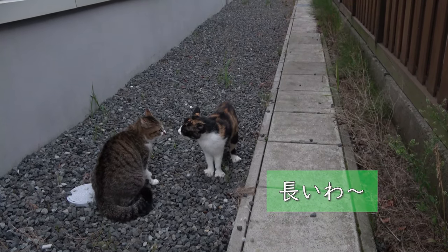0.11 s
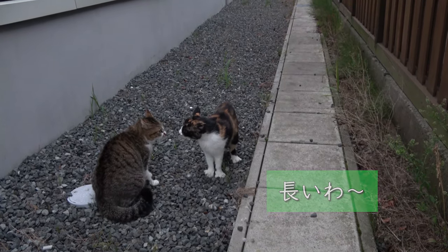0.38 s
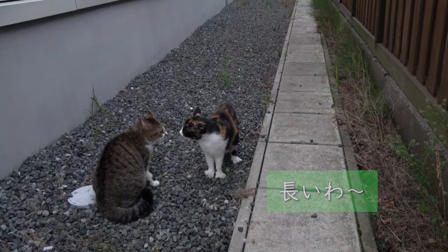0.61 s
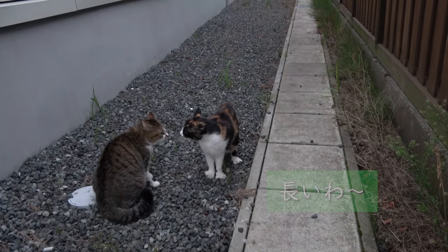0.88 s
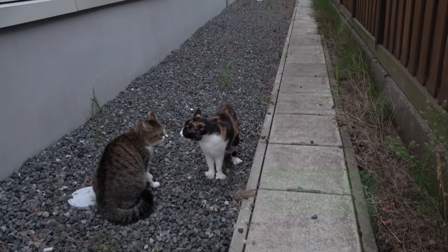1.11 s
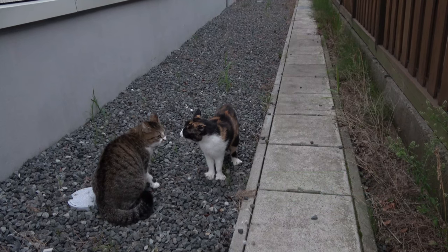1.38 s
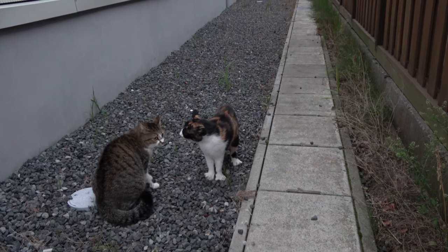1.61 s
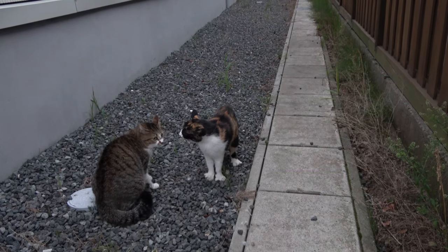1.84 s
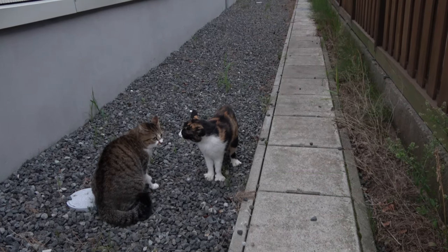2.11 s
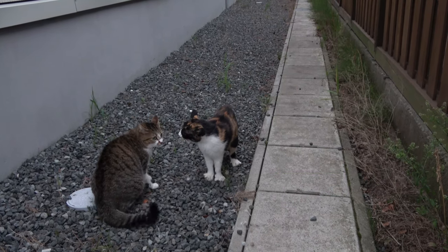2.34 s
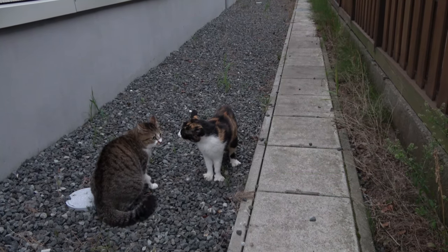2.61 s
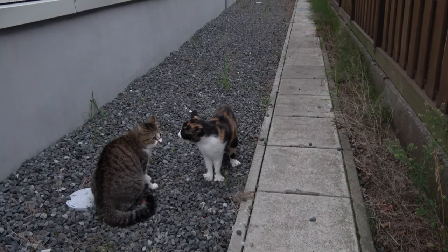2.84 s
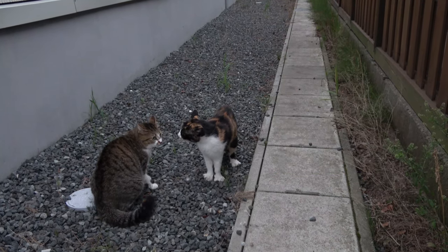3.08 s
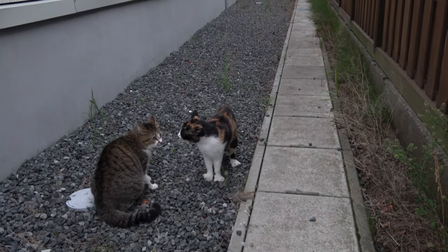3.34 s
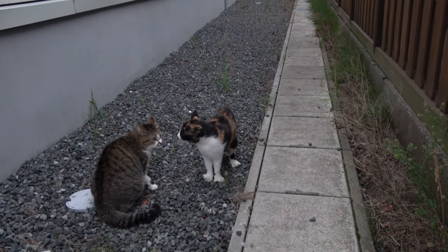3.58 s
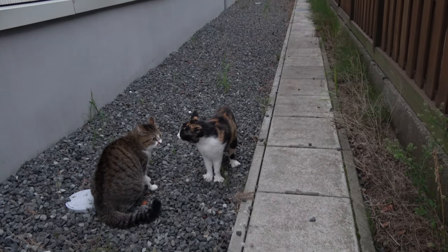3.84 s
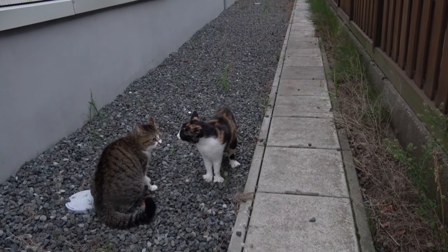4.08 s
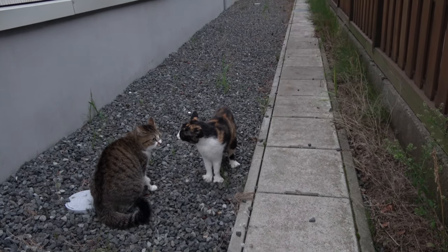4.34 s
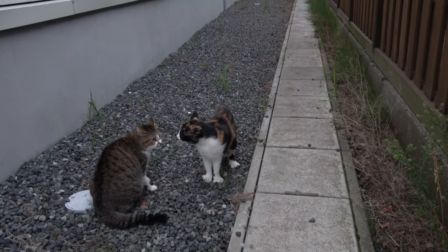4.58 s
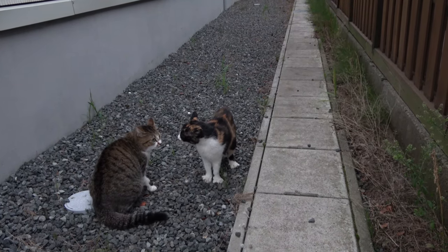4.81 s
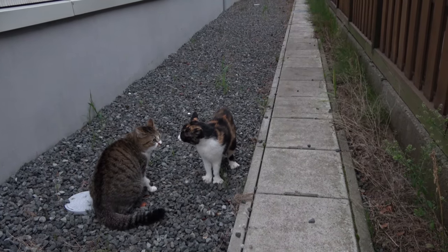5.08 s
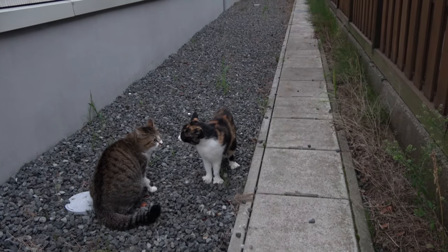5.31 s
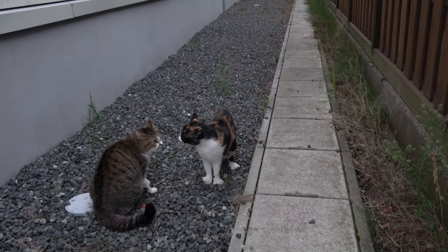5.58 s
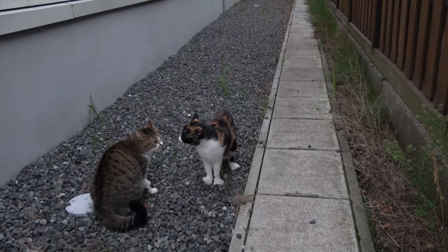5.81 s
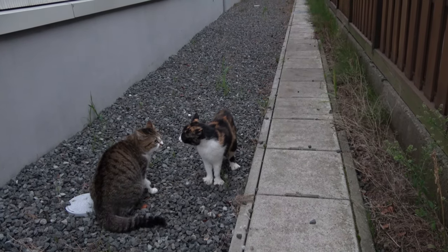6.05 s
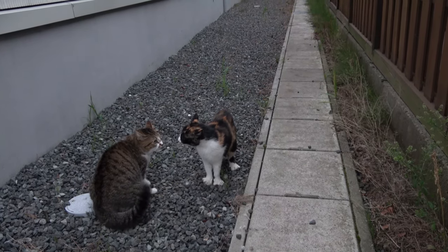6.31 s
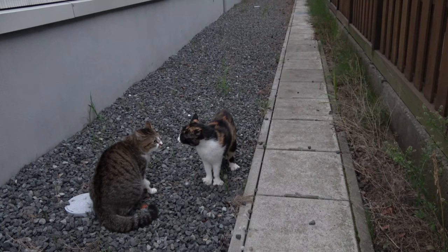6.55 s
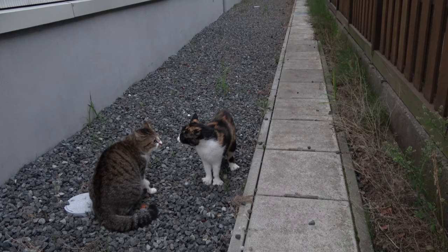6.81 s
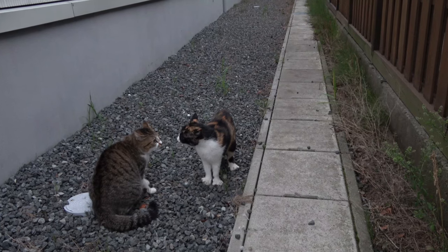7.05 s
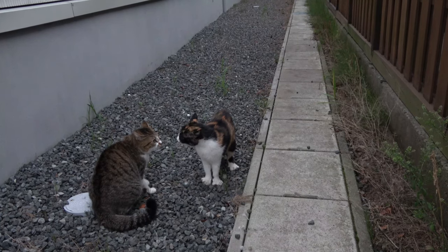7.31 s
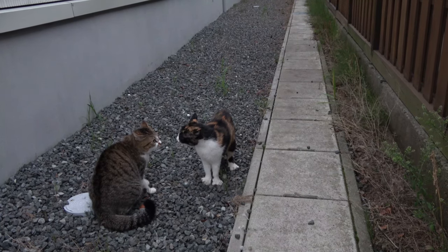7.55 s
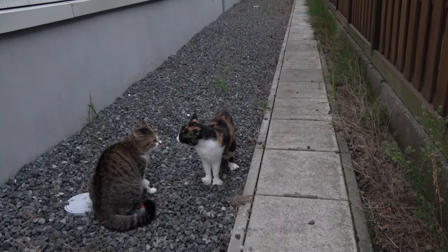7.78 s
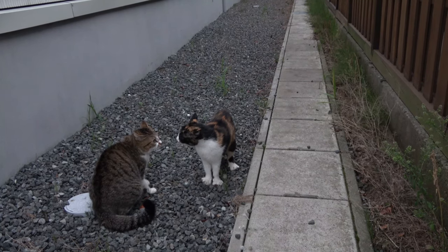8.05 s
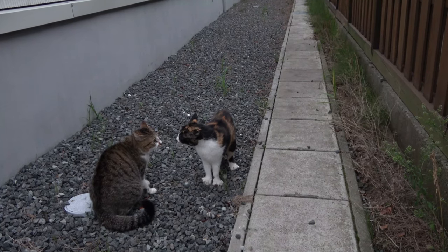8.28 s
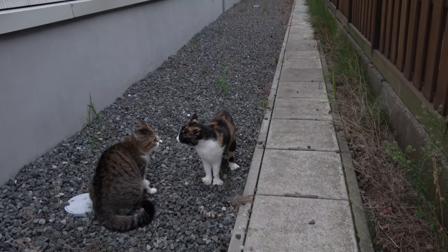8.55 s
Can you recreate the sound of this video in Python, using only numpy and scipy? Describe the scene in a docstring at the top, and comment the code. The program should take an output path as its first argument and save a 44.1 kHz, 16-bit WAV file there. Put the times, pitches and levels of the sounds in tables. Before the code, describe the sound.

Two cats yowl at each other in a narrow gravel alley, drawn-out wails rising, falling and overlapping, with dull handling thumps near the end.

```python
"""Two cats yowling in an alley

Two cats yowl in turns on gravel in a narrow alley, their calls overlapping. Each voice is a sum of
harmonics shaped by the moving resonances of an opening and shutting mouth, with a little breath hiss.
Wall and fence add short delayed copies, and a sparse decaying tail adds the alley's reverberation.
Behind lies town hum of shaped noise; gravel ticks are puffs of filtered noise, and late on
a low noise rumble swells with dull knocks made of two damped modes."""
import sys
import numpy as np
from scipy import signal
from scipy.fft import rfft, irfft, next_fast_len
from scipy.io import wavfile
from scipy.ndimage import uniform_filter1d

SR = 44100
rng = np.random.default_rng(int(sys.argv[2]) if len(sys.argv) > 2 else 0)


def transcribe(u):
    """Save the signal u as a 16-bit wav file named by the first command-line argument.

    u: samples, shape (n,) or (channels, n), limited to [-1, 1]; the rate is SR.
    q: integer samples, one column per channel.
    """
    v = np.clip(np.atleast_2d(u).T, -1, 1)
    q = np.round(v * 32767).astype(np.int16)
    wavfile.write(sys.argv[1], SR, q)


def gain_from_decibels(decibels):
    """Convert decibel values to linear amplitude factors."""
    exponent = np.asarray(decibels, float) / 20
    return 10 ** exponent


N = 381906  # length [samples]


def read(points, hz):
    """Spectral interpolation: reads a table of (frequency, value) on a log-frequency axis."""
    f, value = np.transpose(points)
    return np.interp(np.log(hz + 1), np.log(f + 1), value)


def evened(x):
    """Power normalisation: scales to rms 1."""
    return x / np.sqrt(np.mean(x ** 2) + 1e-20)


def add(mix, s, sound):
    """Superposition: adds a sound to the mix at time s."""
    part = mix[..., round(s * SR):][..., :sound.shape[-1]]
    part += sound[..., :part.shape[-1]]


def smooth_noise(size, hz):
    """Band limitation: low-pass noise of rms 1 that varies up to about hz."""
    lowpass = signal.butter(2, hz, fs=SR, output="sos")
    return evened(signal.sosfilt(lowpass, rng.standard_normal(size)))


# coherence of background noise between the ears: (frequency [Hz], left-right likeness [0-1])
LIKENESS = [(60, 0.98), (240, 0.91), (950, 0.75), (3770, 1), (15000, 0.14)]


def coloured(points, patchy_db):
    """Spectral shaping with partial coherence: stereo noise of rms 1 with drifting patches of level."""
    frames, hz = N // 512 + 5, np.fft.rfftfreq(2048, 1 / SR)
    a, b, c, d, patches = rng.standard_normal((frames, 1025, 5)).T
    patches = uniform_filter1d(patches, size=16, axis=0)
    patches = evened(uniform_filter1d(patches, size=8, axis=1))
    same = np.clip(read(LIKENESS, hz), -1, 1)[:, None]
    left, other = a + 1j * b, c + 1j * d
    z = np.array([left, same * left + np.sqrt(1 - same ** 2) * other])
    z *= gain_from_decibels(read(points, hz)[:, None] + patchy_db * patches)
    return evened(signal.istft(z, nperseg=2048, noverlap=1536)[1][:, :N])


# spectrum of the town hum: (frequency [Hz], relative density [dB per Hz])
HUM_COLOUR = [(15, -29), (25, -12), (53, -14), (156, -14.5), (410, -20.5), (444, -24), (848, -17.5),
              (1020, -26), (1240, -23), (1530, -32.5), (1750, -31.5), (2360, -36), (15500, -52)]


def town_hum():
    """Diffuse sum of many far sources: steady shaped noise at an rms of -47.5 dB."""
    return gain_from_decibels(-47.5) * coloured(HUM_COLOUR, patchy_db=0.24)


# swell of the rumble, silent at -90 dB before the first row: (time [s], rms level [dB])
RUMBLE_SWELL = [(6.499, -57), (6.88, -47.5), (7.18, -43), (7.429, -42.5), (7.79, -47.5), (7.95, -42),
                (8.13, -40), (8.33, -39.5), (8.66, -41.5)]
# spectrum of the rumble: (frequency [Hz], relative density [dB per Hz])
RUMBLE_COLOUR = [(70, -7.5), (150, -2), (240, -7), (340, -1.5), (500, -7.5), (1200, -27), (3000, -40.5)]


def rumble():
    """Amplitude modulation: low shaped noise swells late on."""
    s, level_db = np.transpose(RUMBLE_SWELL)
    swell = gain_from_decibels(np.interp(np.arange(N) / SR, s, level_db, left=-90))
    return coloured(RUMBLE_COLOUR, patchy_db=0.5) * swell


# dull knocks: (time [s], level before onset and decay [dB], upper mode relative to lower [dB])
KNOCKS = [(6.951, -37, 8), (7.087, -45.5, 15), (7.254, -25.5, -32), (7.363, -32, -10), (7.393, -30, -8),
          (7.471, -31.5, -8.5), (7.922, -38, 11), (8.192, -24.5, -4), (8.323, -26, -0.5), (8.397, -32, 3.5),
          (8.493, -35, 3), (8.602, -27, -14)]
# the lower and the upper mode of a knock: (frequency [Hz], decay by 60 dB [s])
KNOCK_MODES = [(143, 0.13), (340, 0.18)]


def knocks():
    """Modal decay: each blow sets off two damped sinusoids with a soft onset."""
    out, t = np.zeros(N), np.arange(SR // 4) / SR
    onset = 1 - np.exp(-t / 0.0032)
    low, high = (np.sin(2 * np.pi * hz * t) * gain_from_decibels(-60 * t / t60) * onset for hz, t60 in KNOCK_MODES)
    for at, db, upper_db in KNOCKS:
        add(out, at, gain_from_decibels(db) * (low + gain_from_decibels(upper_db) * high))
    return out


# ticks of small stones: (time [s], rms before decay, relative to 0.41 [dB], band centre [Hz])
TICKS = [(0.3855, -48.5, 7470), (0.4, -49, 7700), (0.41, -44, 7500), (6.2187, -46, 7200),
         (6.2612, -39.5, 7000), (6.28, -38, 7970), (6.299, -43, 7300), (6.319, -46.5, 7300),
         (6.4973, -41, 7250)]


def gravel():
    """Impulsive friction: shifting stones give band-passed noise puffs that decay exponentially."""
    out, t = np.zeros(N), np.arange(SR // 20) / SR
    for at, db, hz in TICKS:
        band = signal.butter(2, [hz * 0.69, min(hz * 1.2, 16000)], "band", fs=SR, output="sos")
        crackle = evened(signal.sosfilt(band, rng.standard_normal(len(t))))
        add(out, at, 0.41 * gain_from_decibels(db) * crackle * np.exp(-t / 0.01))
    return out


# decay of the alley's reverberation: (frequency [Hz], decay by 60 dB [s])
ALLEY_DECAY = [(300, 0.3), (1200, 0.24), (4000, 0.29), (12000, 0.16)]


def alley(x):
    """Reverberation: convolves with sparse taps of random sign, each band dying at its own speed."""
    taps = np.zeros((2, SR))
    at = np.arange(400, SR - 20, 20) + rng.integers(0, 20, (2, (SR - 401) // 20))
    np.put_along_axis(taps, at, rng.choice([-1., 1.], at.shape), 1)
    # mixing in the other ear's taps makes the two tails alike
    hz, t, z = signal.stft(taps + 0.97 * taps[::-1], SR, nperseg=256)
    decay = gain_from_decibels(-60 * t / read(ALLEY_DECAY, hz)[:, None])
    tail = signal.istft(z * decay, SR, nperseg=256)[1]
    return signal.fftconvolve(x[None], tail / np.linalg.norm(tail[0]), axes=1)[:, :N]


# echoes off wall, fence and ground, before normalising: (delay [s], gain left [-], gain right [-])
ECHOES = [(.0037, 0.73, 0.011), (.0058, -0.55, -0.33), (.0093, 0.19, -0.051), (0.0119, 0.39, -0.029)]


def early(x):
    """Comb filtering: short echoes colour the higher partials differently in each ear."""
    taps = np.zeros((2, SR // 40))
    taps[:, 0] = 1  # direct sound
    for delay, left, right in ECHOES:
        taps[:, round(delay * SR)] = left, right
    return signal.oaconvolve(x[None], taps / np.linalg.norm(taps[0]), axes=1)[:, :N]


def tilted(x):
    """Interaural level difference: the wall favours the left ear below 7 kHz, the fence the right above."""
    below = signal.sosfiltfilt(signal.butter(2, 7000, fs=SR, output="sos"), x)
    above = x - below
    return (below - above) * [[1], [-1]]


# echoes arriving from one side: (delay [s], gain [-])
SIDE_ECHOES = [(.0006, 0.65), (.0031, 0.14), (.0072, 0.29)]


def sideways(x):
    """Lateral reflection: echoes from wall and fence reach the two ears in opposite sign."""
    taps = np.zeros(SR // 50)
    for delay, gain in SIDE_ECHOES:
        taps[round(delay * SR)] = gain
    bright = signal.sosfilt(signal.butter(2, 650, "high", fs=SR, output="sos"), x)
    return signal.oaconvolve(bright, taps)[:N] * [[1], [-1]]


def paths(x, table, dips):
    """Multipath interference: delayed paths to each ear comb the low partials."""
    size = next_fast_len(N + SR // 4)
    hz = np.fft.rfftfreq(size, 1 / SR)
    ears = sum(np.outer(gains, np.exp(-2j * np.pi * hz * delay)) for delay, *gains in table)
    for dip_hz, width, *depth in dips:
        depth = np.clip(depth, -2, 1)[:, None]
        ears = ears * (1 - depth / (1 + 1j * (hz - dip_hz) / width))
    return irfft(rfft(x, size) * ears, size)[:, :N]


def resonate(x, hz, width):
    """Heterodyne resonance: shifts a moving hz down to zero, smooths twice, shifts back."""
    turn, r = np.exp(2j * np.pi * np.cumsum(hz) / SR), np.exp(-np.pi * width / SR)
    return (turn * signal.lfilter([1], np.convolve([1, -r], [1, -r]), x / turn)).real


def vocal_folds(t, hz, rest_rough, rasps):
    """Quasi-periodic oscillation: returns the phase in cycles and the rasp that modulates the partials."""
    bursts = sum(amount * np.exp(-((t - at) / half) ** 4) for at, half, amount in rasps)
    rough = np.clip(rest_rough + bursts, 0, 1) * gain_from_decibels(4 * smooth_noise(len(t), 35))
    # the folds waver slowly, and slip from cycle to cycle when pressed hard
    turns = np.cumsum(hz * (1 + .0025 * smooth_noise(len(t), 30))) / SR
    turns = turns + .03 * rough * smooth_noise(len(t), 200)
    rasp = 1 + rough * evened(uniform_filter1d(smooth_noise(len(t), 230), size=90))
    return turns, rasp


def low_partials(turns, rasp, hz, effort_db, mouth_hz, second_hz, second_db, head):
    """Source-filter principle: two mouth rings and a nasal hum weigh partials 1 to 6."""
    orders = np.arange(1, 7)[:, None]
    ring = lambda centre_hz, width: 1 / (1 + ((orders * hz - centre_hz) / width) ** 2)
    sizes = ring(mouth_hz, head["width"] * mouth_hz)
    sizes = gain_from_decibels(effort_db) * (sizes + gain_from_decibels(second_db) * ring(second_hz, head["second_width"]))
    # the nose carries the first partial, less so as the mouth opens
    nose_db, nose_share, open_db = head["nose"]
    nose_db = nose_db + nose_share * (effort_db + 25) - open_db * np.log2(mouth_hz / 1000)
    sizes[0] = np.hypot(sizes[0], gain_from_decibels(nose_db))
    # each partial wavers a little [dB rms]
    sizes *= gain_from_decibels([db * smooth_noise(len(turns), 13.2) for db in (.4, .4, .6, 1.9, 2.45, 1.94)])
    first, second, *others = sizes * np.cos(2 * np.pi * orders * turns - .6 * orders ** 2)
    return first + second + rasp * sum(others)


# rings that move with the mouth: (factor on the bright ring [-], width [Hz], strength [dB])
THROAT = [(0.999, 457, 5.5), (1.3, 650, -9), (1.63, 698, -12), (2.55, 1005, -19)]
# rings that stay: (frequency [Hz], width [Hz], strength [dB])
SKULL = [(3007, 565, 12.5), (4050, 2920, -7), (8270, 420, -11.5), (12700, 670, -36.5)]


def high_partials(turns, hz, ring_hz, ring_db):
    """Formant filtering: moving throat rings and fixed skull rings weigh partials 7 to 41."""
    hop = 64  # gains are worked out every 64 samples
    orders = np.arange(7, 42)[:, None]
    partial_hz = orders * hz[::hop]
    ring_hz, ring_db = ring_hz[::hop], ring_db[::hop]
    peak = lambda centre_hz, width, db: gain_from_decibels(db) / (1 + ((partial_hz - centre_hz) / width) ** 2) ** 2
    gains = gain_from_decibels(ring_db) * sum(peak(share * ring_hz, width, db) for share, width, db in THROAT)
    gains = gains + sum(peak(*row) for row in SKULL) + gain_from_decibels(-43.0)
    gains /= 1 + (partial_hz / 13600) ** 14
    gains /= np.sqrt((gains ** 2).sum(0))
    # as the head moves, each partial drifts in and out of the echo pattern
    drift = evened(uniform_filter1d(rng.standard_normal(gains.shape), size=70, axis=1))
    gains *= gain_from_decibels(3.6 * drift) * (partial_hz < SR / 2)
    at = np.arange(len(turns))
    return sum(np.interp(at, at[::hop], g) * np.cos(2 * np.pi * k * turns - 0.19 * k * k)
               for k, g in zip(orders[:, 0], gains))


def yowl(rows, head, bright, rasps):
    """Voiced sound with turbulence: returns the start, the low partials, and the high ones with hiss."""
    s, *columns = np.transpose(rows)
    t = np.arange(s[0], s[-1], 1 / SR)
    hz, effort_db, mouth_hz, second_hz, second_db, high_db = (np.interp(t, s, c) for c in columns)
    at, *shape = np.transpose(bright)
    ring_hz, ring_db = (np.interp(t, at, c) for c in shape)
    turns, rasp = vocal_folds(t, hz, head["rough"], rasps)
    low = low_partials(turns, rasp, hz, effort_db, mouth_hz, second_hz, second_db, head)
    high = high_partials(turns, hz, ring_hz, ring_db)
    # air escaping past the folds hisses in the bright ring, one puff a cycle
    hiss = gain_from_decibels(ring_db / 2 - 24) * evened(resonate(rng.standard_normal(len(t)), ring_hz, 800))
    puffs = hiss * (1 + np.cos(2 * np.pi * turns))
    # 12 ms ramps, except where a call is already under way at the start or runs on to the end
    rise, fall = t - s[0] + (s[0] == 0), s[-1] - t + (s[-1] > 8.6)
    ramp = np.minimum(1, np.minimum(rise, fall) / .012)
    fade = np.sqrt(2) * ramp * (1 + 0.067 * smooth_noise(len(t), 25))
    return s[0], fade * low, fade * gain_from_decibels(high_db) * (high * rasp + puffs)


def cat(calls, head, bright, rasps, table, dips):
    """Superposition of one animal's calls: returns its low part at both ears and its mono high part."""
    voice, high = np.zeros(N), np.zeros(N)
    for rows in calls:
        s, body, ring = yowl(rows, head, bright, rasps)
        add(voice, s, body)
        add(high, s, ring)
    return paths(voice, table, dips), high


# one table a call: (time [s], pitch [Hz], effort [dB], lowest mouth ring [Hz], second ring [Hz],
# second ring's strength [dB], level of the higher partials [dB])
SECOND_CALLS = [
    [(0.59, 403, -60.0, 650.0, 1720.0, -12, -80.0), (0.615, 369, -52.0, 650.0, 1720.0, -12, -79),
     (0.655, 404, -45.5, 715, 1833, -16, -72), (0.81, 400.5, -29.5, 658, 1700, -17, -70),
     (0.93, 392.4, -30.5, 671, 1745, -15, -74), (1.08, 404, -30.5, 654, 1738, -12, -68),
     (1.27, 411, -36.6, 706, 1810, -12, -70), (1.35, 397, -32.7, 636, 1700.0, -16, -68),
     (1.43, 359.0, -30, 533, 1518, -16, -70), (1.55, 319.3, -37.5, 601, 1650.0, -14, -71),
     (1.61, 274.5, -63, 600.0, 1644, -12, -72.0)],
    [(3.57, 392.0, -54, 747.4, 1880.0, -10, -71), (3.7, 414, -48.5, 742, 1880.0, -12, -70.5),
     (3.85, 390.6, -51, 750.0, 1880.0, -13, -70), (3.97, 394.0, -46, 750.0, 1880.0, -13, -74),
     (4.28, 380.3, -46.5, 750.0, 1897, -9, -73.0), (4.48, 365, -46, 800, 1900, -16, -63),
     (4.66, 381.6, -37, 780, 1890, -15.5, -64.5), (4.84, 395.2, -19, 672, 1720.0, -11.5, -48.7),
     (4.94, 390.4, -20, 740, 1823, -13, -50), (5.09, 394.3, -19.5, 850, 2072, -17, -45.5),
     (5.18, 411.6, -21.5, 895, 2055, -4, -43), (5.31, 432.7, -8, 1103, 2360, -9, -36),
     (5.39, 430.2, -12, 1190, 2580, -9, -32), (5.53, 452.5, -8.5, 1170, 2476, -10.5, -28.5),
     (5.79, 430.2, -9, 1104, 2400.0, -12, -34), (5.87, 411.4, -16, 933, 2200, -18, -41),
     (5.94, 399, -19.5, 800, 2020, -10.5, -45), (6.02, 378.7, -29, 851, 2030, -10, -46.5),
     (6.11, 354, -27.5, 800, 1980.0, -9.5, -52.7), (6.19, 333.8, -29.5, 746, 1880, -18, -54.5),
     (6.39, 288.0, -34.5, 576, 1590.0, -14, -62.5), (6.47, 282.3, -51, 560.0, 1587, -12, -69)],
]
# width: lowest ring's half width as a share of its frequency [-]; second_width: half width [Hz];
# rough: roughness at rest [0-1]; nose: (level [dB], share of effort [-], loss per octave of opening [dB])
SECOND_HEAD = dict(width=.16, second_width=110, rough=0.017, nose=(-36, 0.034, 1.3))
# bright ring of the mouth, rising as the jaws part: (time [s], frequency [Hz], strength [dB])
SECOND_BRIGHT = [(.6, 3700, 17), (4.5, 3700, 8), (4.9, 4420, 15), (5.1, 5400, 19), (5.33, 5150, 8.7),
                 (5.57, 5580, 1.5), (5.82, 5400, 15), (6.0, 4700, 19), (6.2, 4040, 4)]
# bursts in which the voice breaks up: (middle [s], half length [s], added roughness [0-1])
SECOND_RASPS = [(5.58, .19, .095), (6.3, 0.27, .1)]
# direct path, then ground, wall and fence: (delay [s], gain left [-], gain right [-])
SECOND_PATHS = [(0, 1, 0.96), (0.00079, 0.24, -0.064), (0.00465, 0.05, -0.23), (0.00499, 0.023, 0.077),
                (0.00778, 0.28, 0.34), (0.00845, 0.21, 0.17)]
# narrow dips where later echoes cancel: (frequency [Hz], half width [Hz], depth left [-], depth right [-])
SECOND_DIPS = [(295, 35, .5, .5), (783, 18, 0.32, 0.046), (1380, 25, 0.25, .4), (1714, 30, 0.46, 0.54),
               (2400, 47, 0.27, .3)]


def second_cat():
    """Source-filter voice with a lower mouth ring, nearly equal in both ears on its direct path."""
    return cat(SECOND_CALLS, SECOND_HEAD, SECOND_BRIGHT, SECOND_RASPS, SECOND_PATHS, SECOND_DIPS)


# one table a call: (time [s], pitch [Hz], effort [dB], lowest mouth ring [Hz], second ring [Hz],
# second ring's strength [dB], level of the higher partials [dB])
FIRST_CALLS = [
    [(0.0, 429.4, -14.5, 1120, 2650, -13.5, -26.5), (0.124, 432, -13, 1176, 2720.0, -19, -33.5),
     (0.166, 424.3, -15.5, 1130, 2580, -17.5, -29), (0.222, 422.7, -14, 1110, 2560, -16.5, -34.5),
     (0.27, 431.1, -42, 1090.0, 2650.0, -19, -58)],
    [(0.93, 391.4, -29, 770.0, 2360.0, -17, -58), (0.97, 429, -29, 850, 2440.0, -24, -60),
     (1.01, 452, -24, 940, 2530.0, -22, -55.5), (1.11, 471.4, -21.6, 1221, 2400, -12, -49.5),
     (1.26, 462.2, -16.5, 1240, 2550, -11.5, -46.5), (1.4, 489.3, -17.5, 1445, 2950, -20, -42.1),
     (1.51, 510.4, -22, 1800.0, 3290.0, -16, -33.5), (1.67, 534.8, -12.5, 2027, 3480.0, -22, -27.5),
     (1.83, 541.4, -13.5, 1937, 3420.0, -30, -29.5), (2.14, 556.4, -14.7, 2093, 3550.0, -16, -27),
     (2.38, 537, -11.5, 1879, 3340.0, -13, -27.5), (2.75, 533.9, -15, 1665, 3140.0, -13, -28.5),
     (2.85, 516.4, -18, 2040.0, 3510.0, -17, -27.5), (2.99, 509, -19.5, 1660.0, 3160.0, -20, -31.5),
     (3.02, 496, -13.5, 1490, 3000.0, -20, -32.5), (3.1, 475.7, -13, 1334, 2880.0, -19.5, -31.5),
     (3.365, 452.8, -12, 1250.0, 2800.0, -17, -32), (3.39, 482.3, -11, 1293, 2800, -29, -42),
     (3.46, 474, -12.5, 1231, 2800, -29, -41), (3.54, 459.5, -15.3, 1097, 2800, -27.5, -43.5),
     (3.76, 445.6, -15, 934, 2900, -24, -42), (4.08, 422, -20.5, 998.6, 3000, -18, -36),
     (4.23, 401.7, -23, 956, 2900, -13, -39.5), (4.34, 404, -27, 900.0, 2480.0, -22, -48),
     (4.39, 396.1, -45.0, 900.0, 2480.0, -21, -60)],
    [(6.4, 486.3, -29, 732, 2320.0, -21, -66), (6.45, 524.7, -24, 650.0, 2260.0, -23, -62),
     (6.52, 519, -30, 941, 2560, -9.5, -53), (6.56, 502.2, -30.5, 1417, 2520, -10.5, -53),
     (6.66, 495.7, -25.5, 1332, 2480, -10.5, -50.5), (6.86, 487.8, -17, 1170, 2500, -24, -48),
     (7.1, 476.5, -14.5, 1110, 2600, -21, -47.5), (7.28, 462.8, -16, 980, 2580.0, -20, -46.5),
     (7.49, 436.1, -14.5, 829, 2440.0, -19.5, -49.5), (7.68, 414.8, -22, 824, 2470.0, -20.5, -48),
     (7.92, 429.2, -18.5, 850, 2450.0, -17, -46.5), (8.09, 414.5, -22.5, 870, 2510.0, -19.5, -48.5),
     (8.35, 402.4, -22, 729, 2330.0, -16.5, -50), (8.66, 394.8, -21.5, 712, 2320.0, -15, -49)],
]
# width [-], second_width [Hz], rough [0-1], nose ([dB], [-], [dB per octave]), as for the second cat
FIRST_HEAD = dict(width=0.17, second_width=168, rough=0.013, nose=(-35.5, .27, 6))
# bright ring of the mouth, rising as the jaws part: (time [s], frequency [Hz], strength [dB])
FIRST_BRIGHT = [(0, 6760, -11), (.25, 6370, -2), (.93, 5000, 8), (1.05, 5570, 21), (1.3, 6810, -0.5),
                (1.6, 7640, -17), (2.14, 8010, -9.5), (2.5, 7480, -8), (2.9, 7340, -15), (3.33, 6230, -5.5),
                (3.5, 5640, 5.5), (3.95, 4960, -3), (4.35, 4550, 4.5), (6.5, 5250, 11), (6.6, 6030, 8.5),
                (7.1, 6020, 12.5), (7.3, 5630, 16.5), (7.6, 4620, 13), (8.0, 4600, 11), (8.25, 4050, 3),
                (8.66, 4000, 8)]
# bursts in which the voice breaks up: (middle [s], half length [s], added roughness [0-1])
FIRST_RASPS = [(0.258, .03, 0.54), (4.367, 0.05, .7), (6.48, 0.074, 0.2), (8.44, 0.36, 0.1)]
# direct path, then ground, wall and fence: (delay [s], gain left [-], gain right [-])
FIRST_PATHS = [(0, 1, 0.55), (0.00075, 0.23, 0.23), (0.00091, 0.12, -0.059), (0.00134, -0.13, -0.23),
               (0.00354, 0.49, 0.29), (0.00709, 0.18, -0.00082)]
# dips where later echoes cancel, lifts (negative depth) where they add:
# (frequency [Hz], half width [Hz], depth left [-], depth right [-])
FIRST_DIPS = [(495, 30, .45, .35), (826.8, 11.2, 0.77, .85), (900, 45, -.3, -.6), (1014, 17, .6, .55),
              (1090, 40, -.2, -0.38), (1470, 45, -.35, -.45), (1555, 20, 0.6, 0.52), (1660, 80, 0.58, 0.36),
              (2120, 80, -.7, -1.1), (2400, 41, 0.3, .4), (2660, 90, .6, .5)]


def first_cat():
    """Source-filter voice with a higher mouth ring, stronger in the left ear on its direct path."""
    return cat(FIRST_CALLS, FIRST_HEAD, FIRST_BRIGHT, FIRST_RASPS, FIRST_PATHS, FIRST_DIPS)


def scene():
    """Linear superposition of both cats, the gravel, the alley and the background."""
    first_low, first_high = first_cat()
    second_low, second_high = second_cat()
    low, high = first_low + second_low, first_high + second_high
    near = low + gain_from_decibels(-24) * sideways(low.mean(0))
    near = near + early(high) + gain_from_decibels(-24.0) * tilted(high) + gravel()
    return near + gain_from_decibels(-13.0) * alley(near.mean(0)) + town_hum() + rumble() + knocks()


def band_limit(x):
    """A steep low-pass at the top of the band."""
    return signal.sosfilt(signal.butter(12, 15630, fs=SR, output="sos"), x)


def record(dry):
    """High-pass response: the microphone drops the deepest bass, below 36 Hz."""
    thinned = signal.sosfilt(signal.butter(2, 36, "high", fs=SR, output="sos"), dry)
    return band_limit(thinned)


dry = scene()
out = record(dry)
transcribe(out)
```